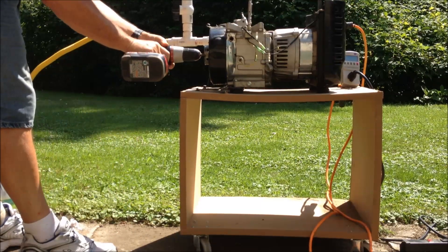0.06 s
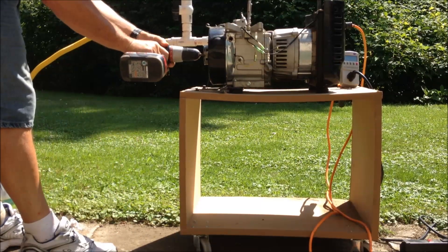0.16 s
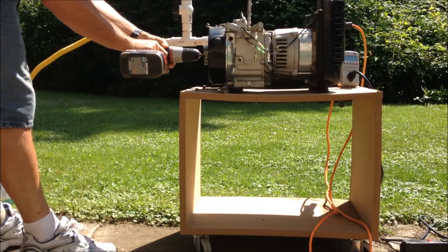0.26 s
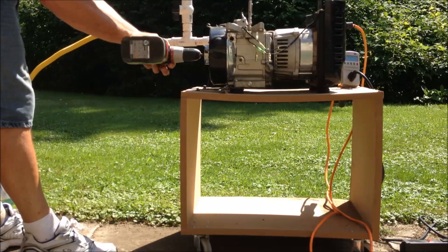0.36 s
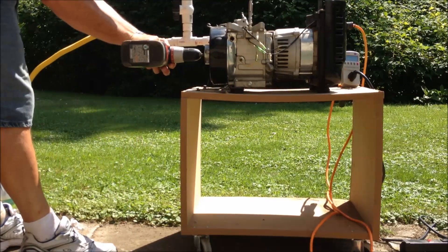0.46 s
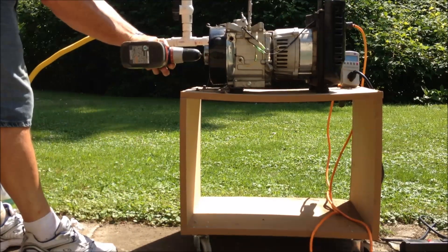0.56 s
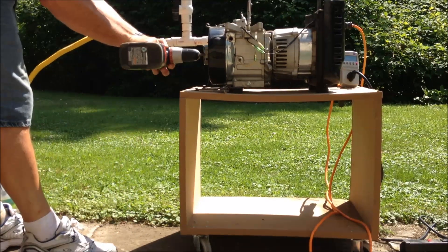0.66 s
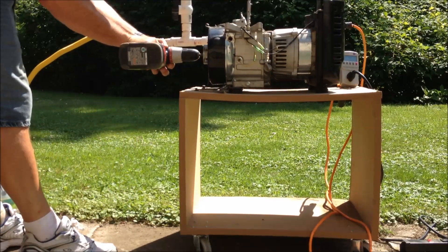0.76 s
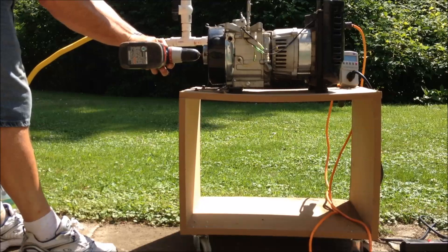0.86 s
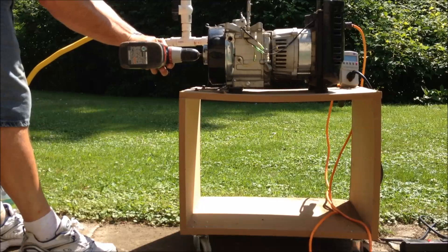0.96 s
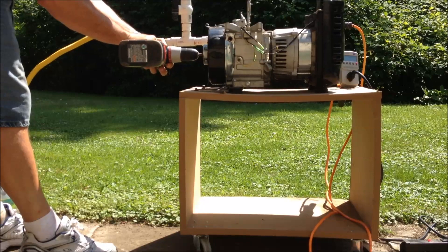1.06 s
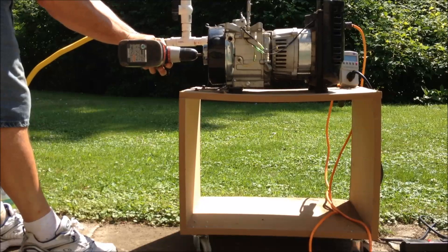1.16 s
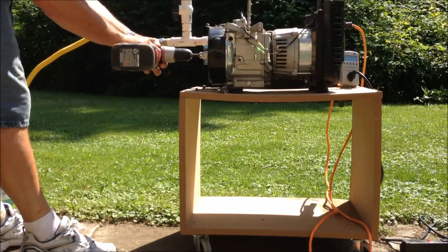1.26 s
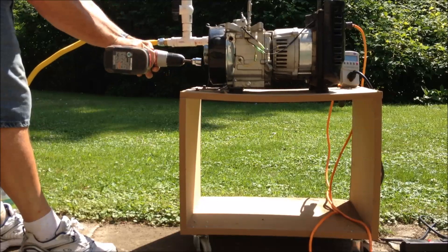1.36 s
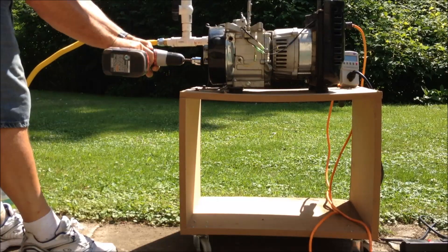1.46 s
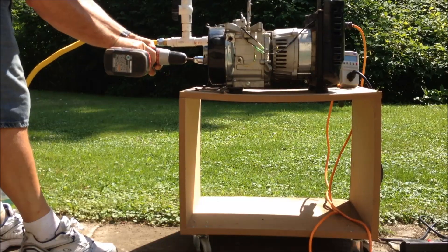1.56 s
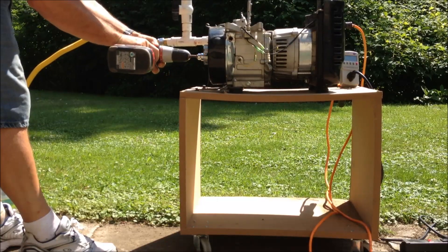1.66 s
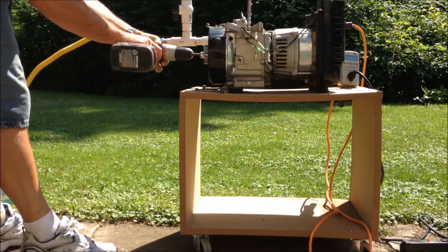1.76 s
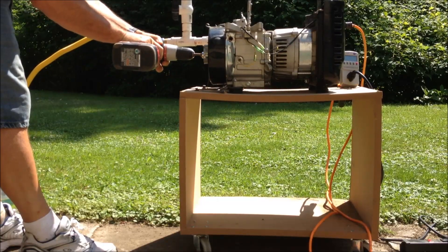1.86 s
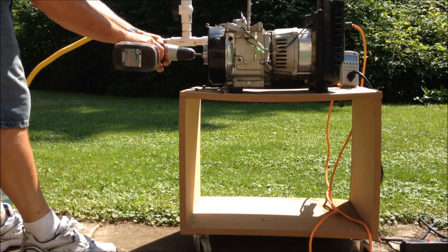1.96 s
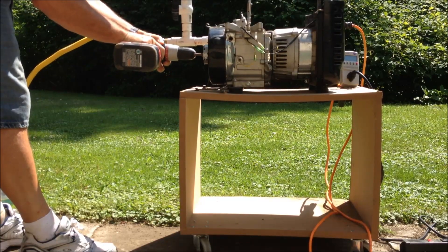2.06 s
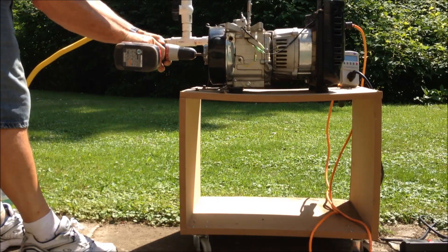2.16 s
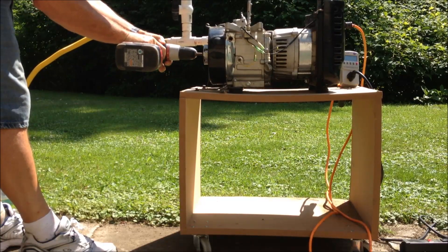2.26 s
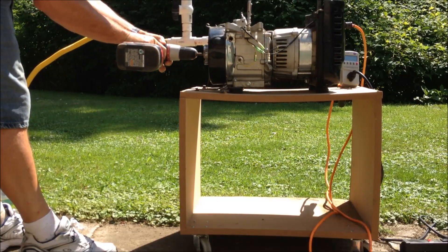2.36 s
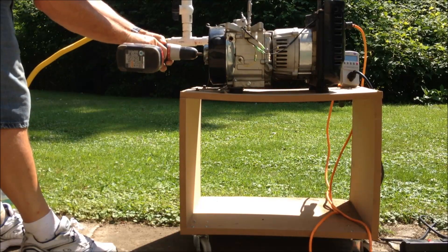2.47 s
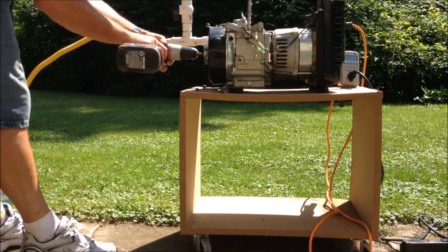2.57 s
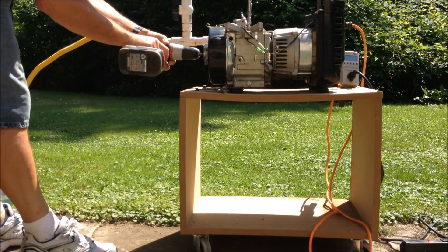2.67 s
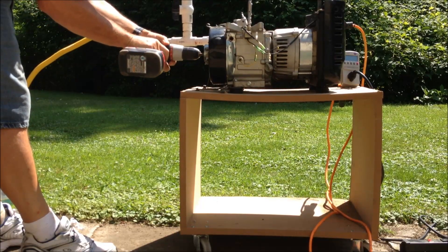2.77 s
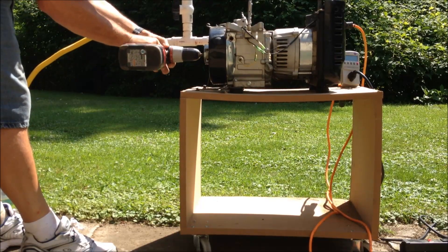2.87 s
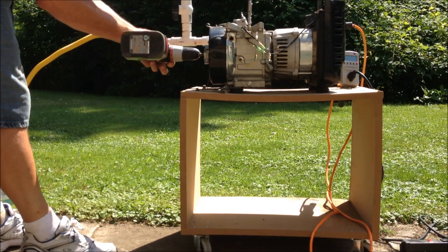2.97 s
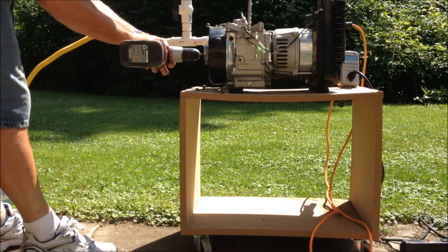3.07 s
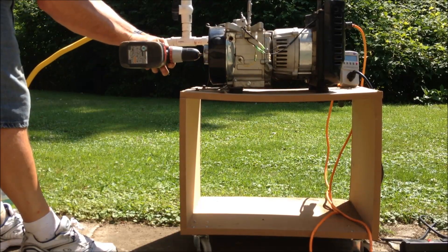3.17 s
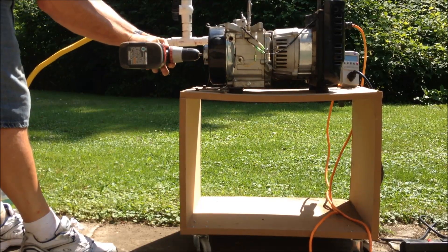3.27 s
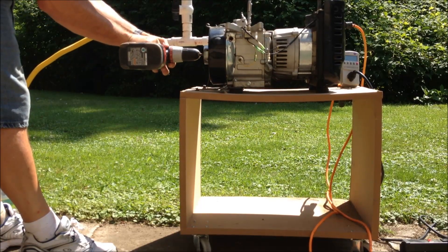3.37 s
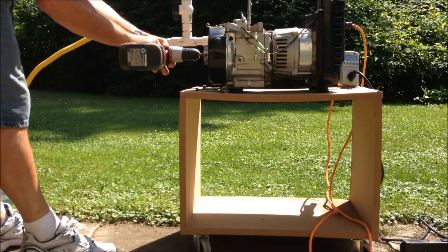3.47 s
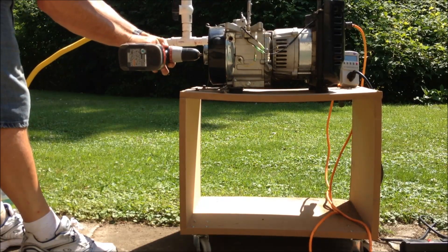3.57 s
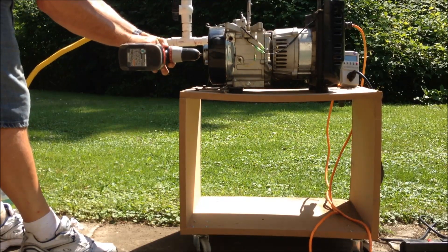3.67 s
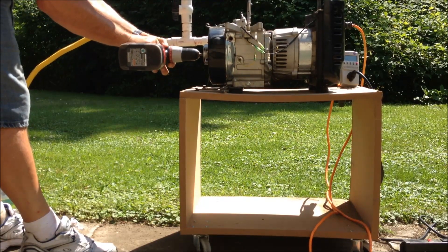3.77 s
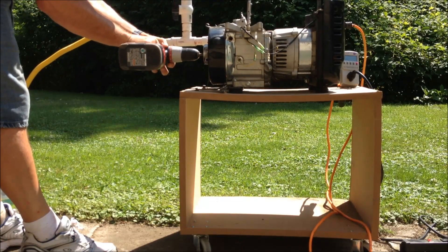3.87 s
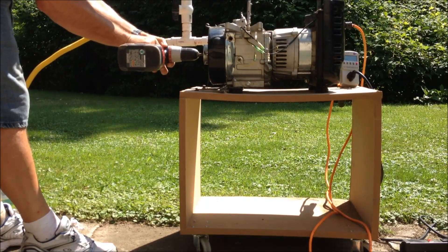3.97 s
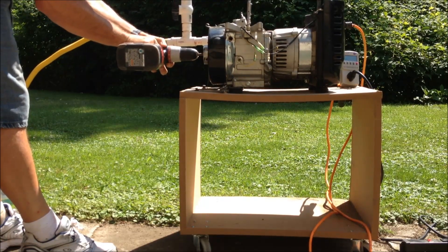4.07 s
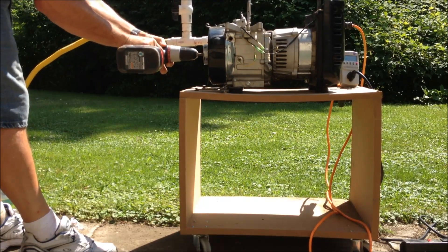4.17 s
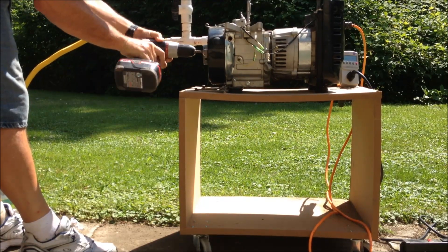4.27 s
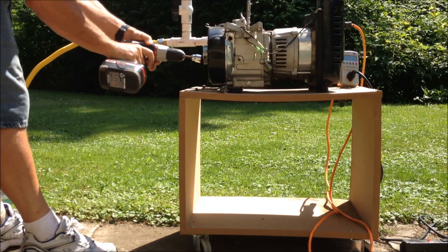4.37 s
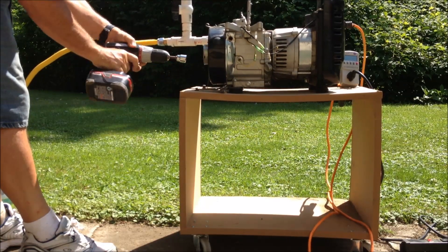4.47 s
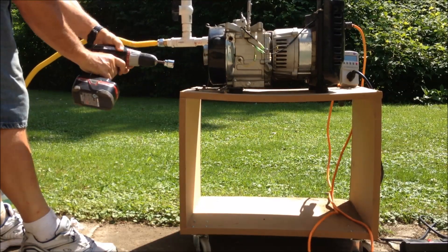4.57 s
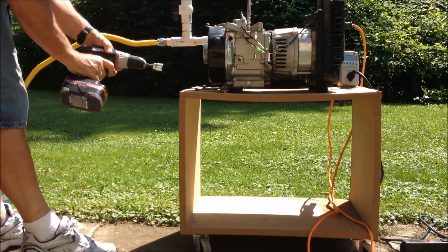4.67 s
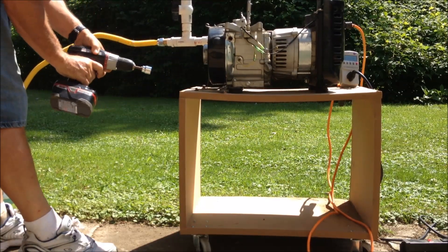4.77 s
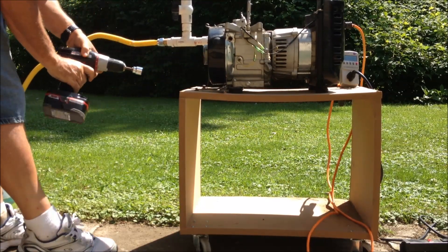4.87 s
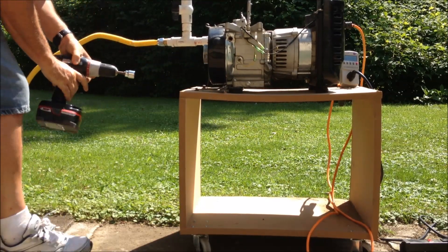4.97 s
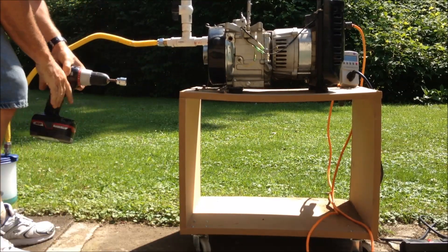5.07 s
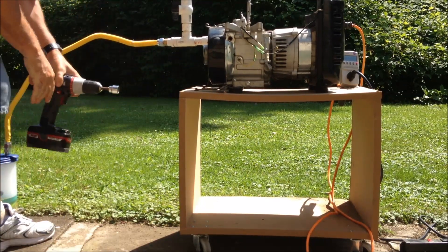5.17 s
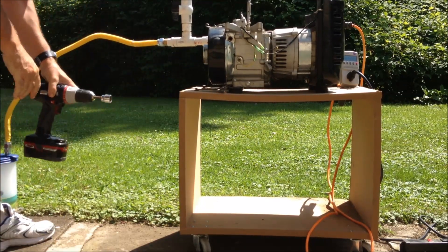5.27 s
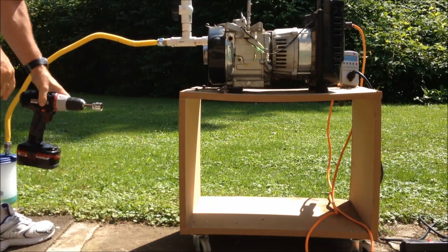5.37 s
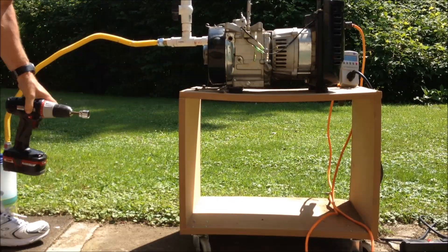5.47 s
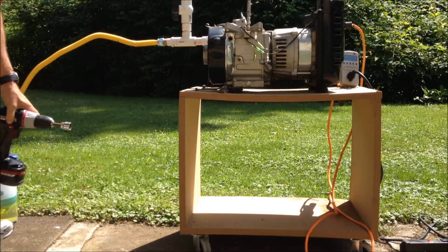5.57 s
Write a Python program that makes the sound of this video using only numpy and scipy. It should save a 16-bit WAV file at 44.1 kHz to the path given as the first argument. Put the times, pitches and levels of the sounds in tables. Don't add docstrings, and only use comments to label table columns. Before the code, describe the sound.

A cordless drill whines and rattles a small petrol engine over, it coasts down knocking, then a second pull makes it fire and run.

```python
import sys
import numpy as np
from scipy import signal
from scipy.fft import rfft, irfft
from scipy.io import wavfile
from scipy.ndimage import uniform_filter1d

SR = 44100
rng = np.random.default_rng(int(sys.argv[2]) if len(sys.argv) > 2 else 0)


def nominal_scale(level):
    x = np.asarray(level, float) / 20
    return 10 ** x


def log_audio(samples):
    frames = np.atleast_2d(samples).T
    limited = np.clip(frames, -1, 1)
    pcm = np.round(limited * 32767).astype(np.int16)
    wavfile.write(sys.argv[1], SR, pcm)


N = 247401
T = np.arange(N) / SR

# start in s, release in s, top gear pitch in Hz, engine cycle phase at release (0-1).
PULLS = [
    (0.358, 1.232, 2943, 0.23),
    (2.926, 3.981, 2943, 0.89),
]
TEETH_PER_CYCLE = 302
TRIGGER_S = 0.069


def curve(rows, quiet=-120):
    s, *cols = np.transpose(rows)
    out = []
    for c in cols:
        before = min(c[0], quiet) if c[0] < 0 else c[0]
        after = min(c[-1], quiet) if c[-1] < 0 else c[-1]
        out.append(np.interp(T, s, c, left=before, right=after))
    return out


def unit(x):
    return x / np.sqrt(np.mean(x ** 2))


def colour(x, points):
    hz, db = np.transpose(points)
    size = 8192
    freqs_hz = np.fft.rfftfreq(size, 1 / SR)
    log_gain = np.interp(np.log(freqs_hz + 1), np.log(hz), db) * np.log(10) / 20
    cep = irfft(log_gain)
    cep[1:size // 2] *= 2
    cep[size // 2 + 1:] = 0
    impulse = irfft(np.exp(rfft(cep)))
    return signal.fftconvolve(x, impulse)[:len(x)]


def ring(x, hz, width_hz):
    return signal.lfilter(*signal.iirpeak(hz, hz / width_hz, SR), x)


def walk(rate_hz):
    k = int(SR / rate_hz)
    steps = np.repeat(rng.standard_normal(N // k + 1), k)
    smooth = uniform_filter1d(uniform_filter1d(steps, k), k)
    return unit(smooth[:N])


def gate(start_s, end_s, rise_s, fall_s):
    return np.clip(np.minimum((T - start_s) / rise_s, 1 - (T - end_s) / fall_s), 0, 1)


def bursts(rows):
    env, t = np.zeros(N), np.arange(SR // 3) / SR
    for s, db, rise_s, t60_s in rows:
        i = int(s * SR)
        rise = np.minimum(t / max(rise_s, 1e-4), 1)
        decay_db = -60 * np.maximum(t - rise_s, 0) / max(t60_s, .01)
        env[i:i + len(t)] += (rise * nominal_scale(db + decay_db))[:N - i]
    return env


def grit(spread_db):
    sizes = np.minimum(rng.exponential(size=N // 24 + 1), 3)
    return unit(rng.standard_normal(N) * nominal_scale(spread_db * np.repeat(sizes, 24)[:N]))


def garden():
    # frequency in Hz, level in dB.
    traffic = [(40, -20.5), (105, -7.5), (200, -2), (370, -10), (900, -0.5), (1400, -6), (2200, -14.5),
               (3000, -20.5), (4300, -23), (4800, -38.5), (8000, -35.5), (10000, -43), (15500, -50)]
    # time in s, pitch in Hz, level in dB.
    far_motor = [(0, 141, -54), (.7, 136.7, -43), (1.3, 135.3, -49.5), (2, 136, -42.5), (2.7, 133.7, -47.5),
                 (3.4, 130.5, -49), (4, 132.6, -44), (5.61, 131.2, -53)]
    traffic_db = -39.5 - 1.5
    hz, db = curve(far_motor)
    turn = 2 * np.pi * np.cumsum(hz * (1 + 0.008 * walk(8.97))) / SR
    out = np.sin(turn) * nominal_scale(db + 3.0 * walk(4.47))
    for swell_hz in (3.0, 12.0):
        noise = unit(colour(rng.standard_normal(N), traffic))
        out += noise * nominal_scale(traffic_db + 0.43 * walk(swell_hz))
    return out


def wall_echo(near):
    t = T[:SR // 4]
    tail = rng.standard_normal(SR // 4) * nominal_scale(-60 * t / 0.28) * (t > .012)
    return nominal_scale(-42.5) * signal.fftconvolve(near, tail)[:N]


def gas_leak():
    # time in s, level in dB, rise in s, t60 in s.
    leaks = [(2.335, -56, .03, .3)]
    return unit(ring(rng.standard_normal(N), 14800.0, 900.)) * bursts(leaks)


def clinks():
    # time in s, peak in dB.
    scrapes = [(2.3655, -29.5), (2.4089, -32), (2.7285, -34), (4.3715, -8), (4.376, -11), (4.3955, -25)]
    # frequency in Hz, level in dB, t60 in s.
    socket = [(6460, -20, 0.15), (6640, -9, 5.0), (7750, -2, 0.089), (8300, -6.5, 0.1), (10800, -27, 0.14),
              (10430, -32, 0.46), (12200, -25, 0.4), (12900, -26, 0.13)]
    hits = grit(2.0) * bursts([(s, db, .002, .05) for s, db in scrapes])
    steel = sum(nominal_scale(db) * ring(hits, hz, 3.7 / min(t60_s, .12)) for hz, db, t60_s in socket)
    return nominal_scale(15.5) * steel + nominal_scale(-16) * hits


def shaft():
    # time in s, shaft turns in Hz, exhaust level in dB.
    run = [(4.3, 22.5, -44), (4.55, 22.5, -30), (4.6, 19.5, -37), (4.65, 21.6, -27), (4.72, 23.4, -28),
           (4.81, 25, -29.5), (4.96, 24.2, -28.5), (5.23, 23.05, -31), (5.61, 23.8, -27)]
    firing_s = 4.994
    hz, db = curve(run)
    turns = np.cumsum(hz) / SR
    return turns - turns[int(firing_s * SR)], db


def exhaust():
    # multiple of the shaft rate, level in dB.
    muffler = [(1, -47), (2, -45), (3, -28), (4, -27), (5, -17.5), (6, -9), (7, -10.5), (8, -1), (9, -4.5),
               (10, -23), (11, -16), (12, -10.5), (13, -41), (14, -20.5), (15, -20), (16, -14)]
    # frequency in Hz, width in Hz, level in dB.
    shield_modes = [(715, 10, -11), (1117, 45, 4)]
    turns, db = shaft()
    throb = 0
    for k, harmonic_db in muffler:
        level = nominal_scale(harmonic_db + 1.1 * walk(15))
        delay = 0.055 * (k - 7) ** 2
        throb = throb + level * np.cos(2 * np.pi * k * (turns - .15) - delay + 0.35 * walk(19))
    throb = unit(throb) * (1 + 0.17 * np.cos(np.pi * (turns - .15)))
    pulses = np.diff(np.floor(turns), prepend=0) * (T > 4.3)
    shake = unit(pulses) + 1.8 * rng.standard_normal(N)
    shield = unit(sum(nominal_scale(d) * ring(shake, hz, width_hz) for hz, width_hz, d in shield_modes))
    return nominal_scale(db) * (throb + nominal_scale(-4) * shield)


def casing(x, ring_db):
    # frequency in Hz, width in Hz, level in dB.
    mode_rows = [(501, 22, -2), (691.6, 5.8, 0.5), (711.4, 12.7, 0.5), (822, 10, -2), (903, 18, -2.5),
                 (1111, 19.4, -3.5), (1636, 37, -7.5), (2024, 23, -11.5), (2212, 24, -4), (2444, 27, -8.5),
                 (2671, 65, -6), (3100, 116, -9), (3476, 44, -10), (3786, 10, -0.5), (3850, 22, -27),
                 (4204, 22, -1.5)]
    # frequency in Hz, level in dB.
    plates = [(200, -32), (330, -33), (450, -8), (700, -1.5), (1460, -2), (2230, -2), (4100, -7),
              (4700, -24), (6000, -24.5), (9000, -41), (15000, -76)]
    modes = sum(nominal_scale(db) * ring(x, hz, width_hz) for hz, width_hz, db in mode_rows)
    return colour(x + nominal_scale(ring_db) * modes, plates)


def pull(start_s, end_s, top_hz, phase):
    run_up_s, let_go_s = .157, 0.0149
    speed = np.maximum(1 - np.exp(-np.maximum(T - start_s, 0) / run_up_s), .25)
    cycles = np.cumsum(top_hz * speed) / SR / TEETH_PER_CYCLE
    return speed, gate(start_s, end_s, TRIGGER_S, let_go_s), cycles - cycles[int(end_s * SR)] + phase


def coasting():
    # time in s, knocks in dB, chuff in dB.
    coast = [
        (1.2917, -0.3, -23.5),
        (1.404, -1, -23),
        (1.5262, -1.5, -24.5),
        (1.6665, -0.2, -24),
        (1.829, -1, -27),
        (2.0295, -2.3, -28.5),
        (2.3263, -4, -30.5),
    ]
    # phase 0-1, knock in dB, brightness in dB (bright noise up, dull noise down), t60
    # in s, chuff in relative dB.
    valves = [
        (.321, -13, -5.5, 0.086, -30),
        (.463, -35, -2, .09, -8),
        (.61, -8, 3.5, 0.071, -16),
        (.8, -15.5, -6.5, .08, -26),
        (0.896, -11, -2, 0.16, -5.5),
    ]
    valve_lead = 0.0043
    rise_s, opening_t60_s, puff_t60_s = 0.002, .1, 0.14
    s, knock_db, chuff_db = np.transpose(coast)
    near_s = T[int(s[0] * SR):int(s[-1] * SR)]
    cycles = np.polyval(np.polyfit(s, np.arange(len(s)), deg=4), near_s)
    knocks = []
    chuffs = [(at, db, rise_s, opening_t60_s) for at, db in zip(s, chuff_db)]
    for k in range(len(s) - 1):
        for phase, db, tilt, t60_s, puff_db in valves:
            at = np.interp(k + phase - valve_lead * k, cycles, near_s)
            knocks.append((at, db + knock_db[k], t60_s, tilt))
            chuffs.append((at, puff_db + chuff_db[k], rise_s, puff_t60_s))
    return knocks, chuffs


def cranking():
    phase, db, t60_s, tilt = (0.45, -9.5, 0.04, 4)
    knocks = []
    for row in PULLS:
        speed, on, turned = pull(*row)
        snaps = np.diff(np.floor(turned - phase)) > 0
        fast = (on * speed > .75)[1:]
        knocks += [(at, db, t60_s, tilt) for at in T[1:][snaps & fast]]
    return knocks


def tappets():
    from_s, level_db, scatter_db, t60_s = 4.64, -14.5, 3, 0.079
    beats = T[1:][(np.diff(np.floor(shaft()[0])) > 0) & (T[1:] > from_s)]
    chance = rng.standard_normal((64, 2))
    return [(at, level_db + scatter_db * c[0], t60_s, 4 * c[1]) for at, c in zip(beats, chance)]


def strokes():
    # time in s, peak in dB, t60 in s, brightness
    # in dB (bright noise up, dull noise down).
    jolts = [(0.3467, -27, 0.23, 4), (0.4719, -9, 0.17, 1), (0.5163, -11, 0.11, 7),
             (1.2513, -11.5, 0.17, 6.5), (2.3668, -16.5, 0.067, 2), (2.4112, -25.5, 0.14, 6),
             (2.7135, -31, 0.12, 3), (2.9021, -26, 0.11, 4), (2.92, -13.5, 0.1, 2), (2.9589, -30, 0.12, 8),
             (3.0352, -9.5, 0.075, 5.5), (3.0886, -10, 0.06, -1), (3.1859, -16, 0.08, -2),
             (3.2248, -14, 0.078, 4), (4.2786, -11.5, 0.063, 6), (4.3723, -5.5, 0.081, 3),
             (4.4226, -9.5, 0.08, 8), (4.4965, -4.5, 0.13, 2.5), (4.5514, -6, 0.08, 2),
             (4.612, -4.5, 0.33, 0.1)]
    # time in s, peak in dB, t60 in s.
    coughs = [
        (2.3658, -30.5, 0.14),
        (2.9185, -25, 0.13),
        (4.0318, -19, .089),
        (4.0637, -35, .084),
        (4.1086, -24, 0.12),
        (4.166, -30, 0.09),
        (4.2438, -31, 0.19),
        (4.3051, -23, 0.095),
    ]
    knocks, chuffs = coasting()
    knocks = list(jolts) + knocks + cranking() + tappets()
    chuffs = [(s, db, 0.002, t60_s) for s, db, t60_s in coughs] + chuffs
    return knocks, chuffs


def knocking(knocks):
    out = np.zeros(N)
    for treble_db, sign in ((-8.0, -1), (7.0, 1)):
        noise = unit(casing(colour(grit(1.5), [(700, -2.5), (2400, 0), (4200, treble_db)]), 5.4))
        out += noise * bursts([(s, db - 17 + sign * tilt, .0028, t60_s) for s, db, t60_s, tilt in knocks])
    return out


def air_flow(chuffs, rattle_db, running, puff):
    # frequency in Hz, level in dB per Hz.
    hiss = [(2350, -15), (4000, -2.5), (4330, -7.5), (4800, -20.5), (6220, -12.5), (7810, -11.5),
            (10100, -18.5), (11900, -23), (15500, -28.5)]
    # start in s, end in s.
    driven_spans = [
        (.48, 1.305),
        (2.981, 6),
    ]
    driven = sum(gate(a, b, 0.073, .03) for a, b in driven_spans)
    coast_db = -47.5 + 2.2 * (rattle_db + 27.5)
    air_db = driven * (rattle_db - 8.5) + (1 - driven) * coast_db
    air = unit(colour(grit(1.0), hiss))
    air += 0.68 * running * ring(air, 11900.0, 780.0)
    flow = nominal_scale(air_db) * (1 + 0.94 * running * (puff - .4))
    return air * (flow + bursts([(s, db - 9.5, rise_s, t60_s) for s, db, rise_s, t60_s in chuffs]))


def engine():
    # time in s, casing rattle in dB.
    effort = [(.28, -57), (.38, -35.5), (.59, -27.5), (1.07, -25), (1.26, -28.5), (1.35, -31.5),
              (1.72, -32), (2.09, -38), (2.46, -46), (2.76, -81), (2.97, -42), (3.1, -29.5), (3.28, -27),
              (4.17, -25.5), (4.44, -24.5), (4.75, -21), (5.28, -23), (5.61, -22)]
    rattle_db, = curve(effort)
    knocks, chuffs = strokes()
    turns, run_db = shaft()
    running = np.clip((run_db + 50) / 8, 0, 1)
    beat = uniform_filter1d(np.exp(-(turns % 1) / 0.38), size=220)
    puff = beat * (1 + .5 * np.cos(np.pi * np.floor(turns)))
    rattle = unit(casing(grit(1.7) * nominal_scale(0.78 * walk(29.92)), 9.4))
    rattle = rattle * (1 + 0.5 * running * (beat - .4))
    rumble_points = [(60, -33.0), (140, -2.0), (260, 5.5), (420, -12.5), (900, -33.5)]  # (Hz, dB)
    rumble = unit(colour(rng.standard_normal(N), rumble_points))
    rumble_db = -43.5 + 0.43 * (rattle_db + 26.5) + 8.5 * running
    out = nominal_scale(rattle_db) * rattle + nominal_scale(rumble_db) * rumble
    return out + air_flow(chuffs, rattle_db, running, puff) + knocking(knocks)


def socket_chatter():
    # time in s, level in dB, rise in s, t60 in s.
    chatter = [(4.292, -17, 0.0027, .06), (4.303, -15, 0.0022, .05), (4.3105, -15, 0.00083, 0.024),
               (4.319, -16, 0.0016, 0.059), (4.326, -23, .003, 0.061)]
    return unit(ring(ring(grit(2.6), 3050.0, 1600.0), 2650.0, 3000.0)) * bursts(chatter)


def trigger():
    # time in s, pitch in Hz, gear noise in dB.
    dragged = [
        (4.0, 3004, -36),
        (4.1, 3123, -27),
        (4.2, 3206, -27),
        (4.27, 3430, -27),
        (4.31, 3100, -29),
        (4.345, 2790, -38),
    ]
    # phase 0-1, load in dB, length in cycles.
    grips = [(.15, 3.5, .095), (.35, -0.5, 0.15), (.53, 1.5, 0.13), (.72, 1, .11), (.865, 2, .11)]
    whine_db, whine_slow_db = -20 + 3.5, -22
    gear_full_db, gear_slow_db = -26.5, 1.5
    grip_scatter_db, grip_slack_cycles, spin_out_s = 1.23, 0.013, 0.072
    pitch, gear_db = curve(dragged)
    whine, gear, load, sag = 0, nominal_scale(gear_db), np.zeros(N), np.zeros(N)
    for start_s, end_s, top_hz, phase in PULLS:
        speed, on, cycles = pull(start_s, end_s, top_hz, phase)
        pitch = np.where(on > 0, top_hz * speed, pitch)
        whine = whine + on * nominal_scale(whine_db + whine_slow_db * np.sqrt(1 - speed))
        gear_on = gate(start_s - .02, end_s, TRIGGER_S, spin_out_s)
        gear = gear + gear_on * nominal_scale(gear_full_db + gear_slow_db * (1 - speed))
        cycles = cycles[on > 0]
        for at, db, length in grips:
            count = np.round(cycles - at)
            chance = rng.standard_normal((128, 2))[count.astype(int) % 128].T
            place = (cycles - at - count - grip_slack_cycles * chance[0]) / length
            grip = np.exp(-(place / .56) ** 4)
            load[on > 0] += nominal_scale(db + grip_scatter_db * chance[1]) * grip
            sag[on > 0] += place * length * grip * TEETH_PER_CYCLE / top_hz
    return pitch, whine, gear, load, sag


def drill():
    # time in s, level in dB, length in s, from Hz, to Hz.
    slips = [(4.036, -15, 0.012, 3276, 3020), (4.069, -15, 0.019, 3240, 2973),
             (4.119, -18, 0.024, 3180, 3020), (4.161, -15.5, 0.02, 3150, 2980),
             (4.283, -16, 0.023, 3550, 3780)]
    # frequency in Hz, gain in dB.
    housing = [(110, -36), (170, 0.3), (2000, -25), (3000, -1), (4200, 1.5), (5800, -2.5), (6250, 2.5),
               (6500, 11), (6800, -12.5), (9000, 0.5), (14000, -12)]
    # multiple of the mesh pitch, level in dB over gear noise.
    mesh = [(2, -5), (3, -9.5), (4, -20), (5, -17), (.0605, -14)]
    # frequency in Hz, level in dB per Hz.
    gear_noise = [(710, -37), (1200, -18), (2510, -9.5), (2860, -6), (3210, -9.5), (4380, -3.5),
                  (4720, -15), (4980, -5), (5610, -23), (6440, -13.5), (15500, -31.5)]
    pitch, whine, gear, load, sag = trigger()
    whine = whine * (0.081 + load)
    teeth = gear * (0.27 + 0.54 * load) * (T < 4)
    for s, db, length_s, start_hz, end_hz in slips:
        place = (T - s) / length_s
        pitch = np.where(abs(place) < 1, start_hz + (end_hz - start_hz) * (place + .5), pitch)
        yelp = nominal_scale(db) * np.exp(-(2 * place) ** 2)
        whine = whine + yelp
        teeth = teeth + 0.28 * yelp
    turn = 2 * np.pi * np.cumsum(pitch * (1 - 3.3 * sag)) / SR
    out = whine * nominal_scale(walk(150)) * np.sin(turn + .35 * walk(250))
    housing_hz, housing_db = np.transpose(housing)
    for k, db in mesh:
        partial_db = db + np.interp(k * pitch, housing_hz, housing_db) + 2.5 * walk(90)
        out += teeth * nominal_scale(partial_db) * np.sin(k * turn + 0.44 * k * walk(250))
    noise = unit(colour(grit(2.4), gear_noise))
    dull = signal.sosfilt(signal.butter(2, 3500., fs=SR, output="sos"), noise)
    brightness = np.minimum(pitch / 2600, 1) ** 0.83
    return out + gear * nominal_scale(walk(39.83)) * (dull + (noise - dull) * brightness)


def scene():
    near = drill() + socket_chatter() + engine() + exhaust() + clinks() + gas_leak()
    return (near + wall_echo(near) + garden())[None]


def band_limit(x):
    return signal.sosfilt(signal.butter(12, 15780, fs=SR, output="sos"), x)


def record(dry):
    thin = signal.sosfilt(signal.butter(2, 70., "highpass", fs=SR, output="sos"), dry)
    notched = signal.sosfilt(signal.butter(3, [4780., 5230.], "bandstop", fs=SR, output="sos"), thin)
    topped = signal.sosfilt(signal.ellip(8, .3, 60, 15500, fs=SR, output="sos"), notched)
    return band_limit(topped)


dry = scene()
out = record(dry)
log_audio(out)
```